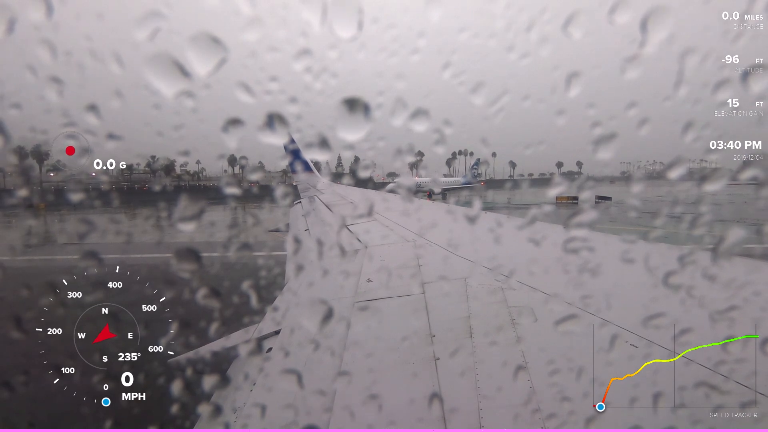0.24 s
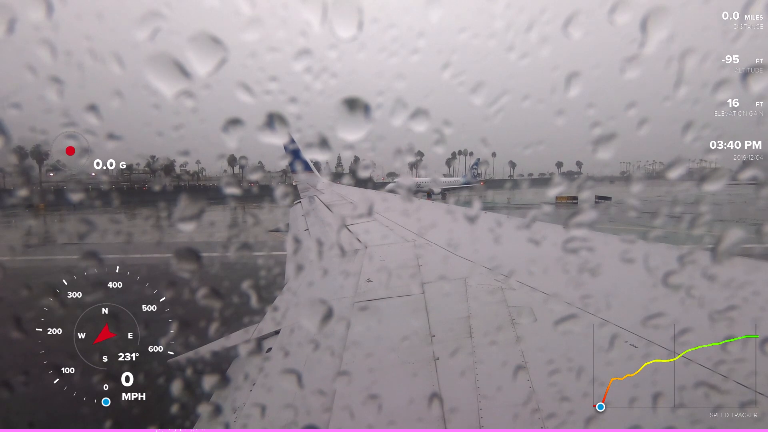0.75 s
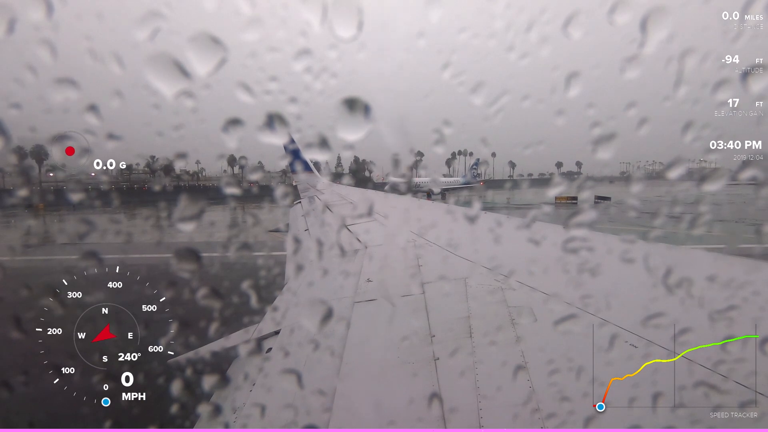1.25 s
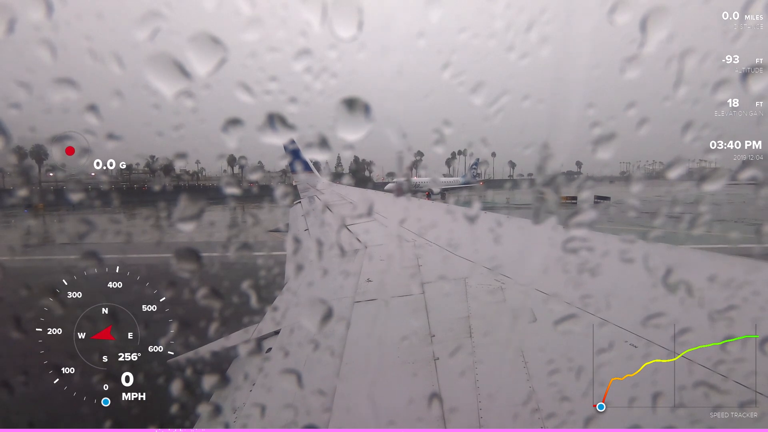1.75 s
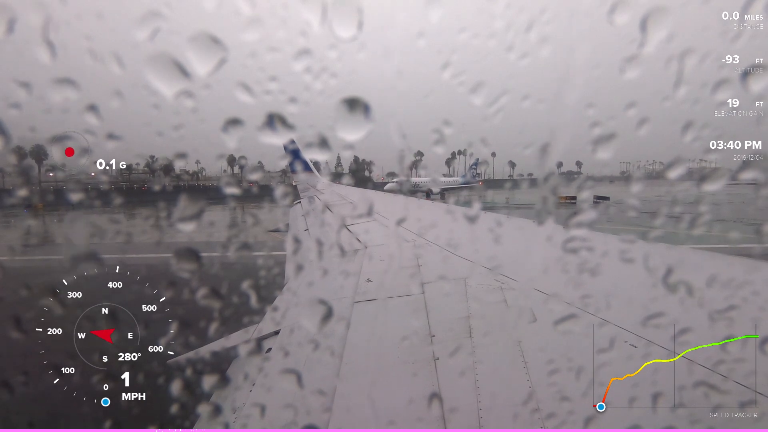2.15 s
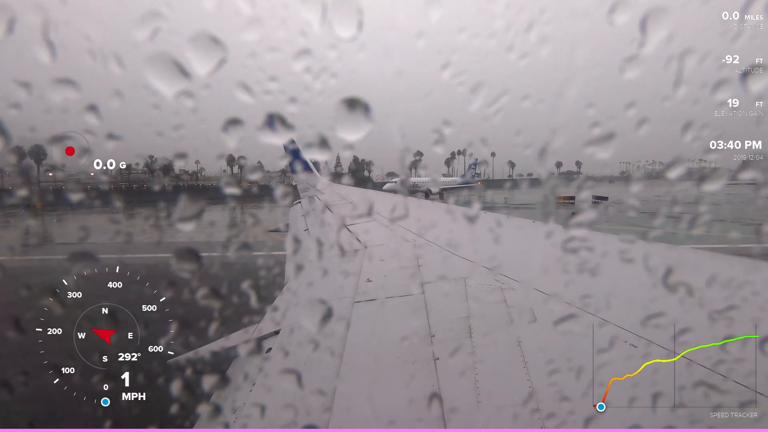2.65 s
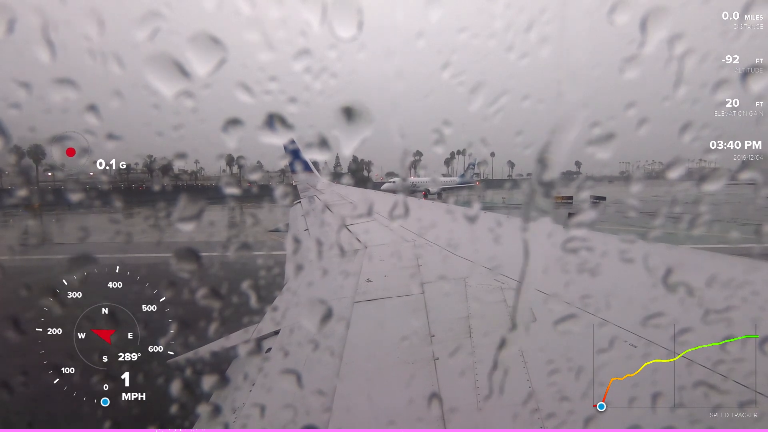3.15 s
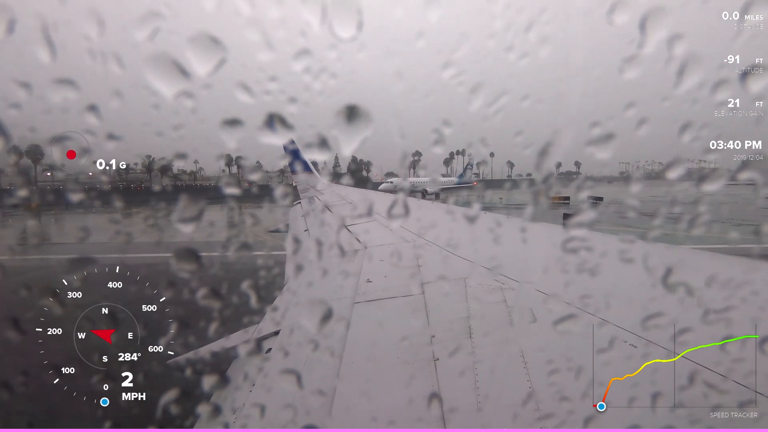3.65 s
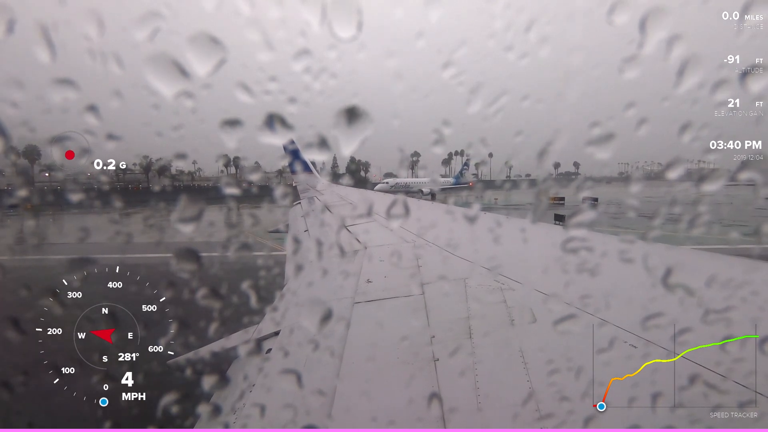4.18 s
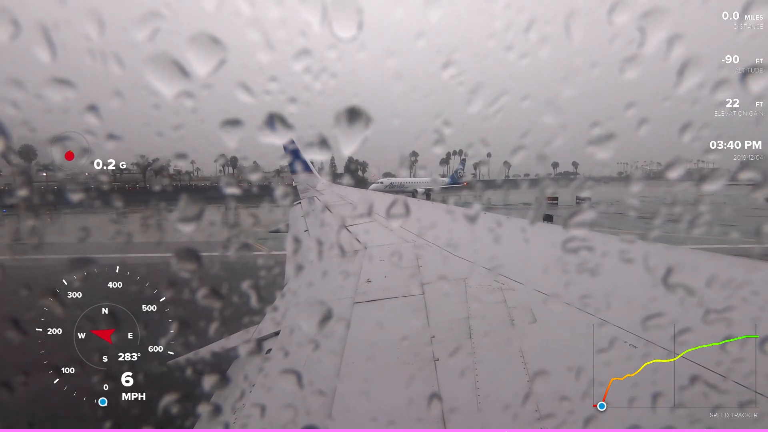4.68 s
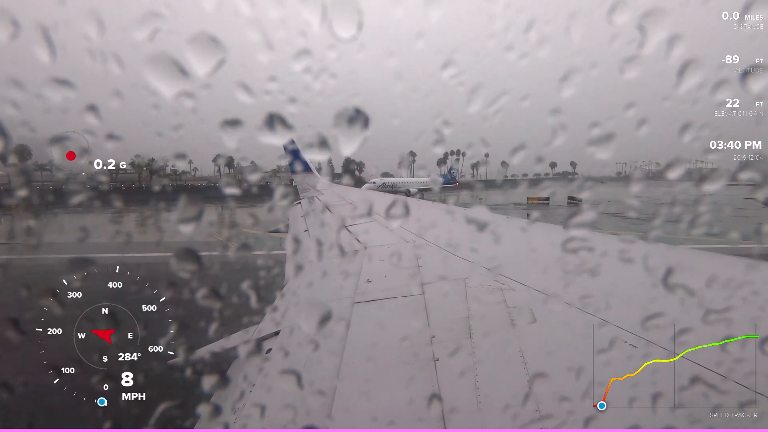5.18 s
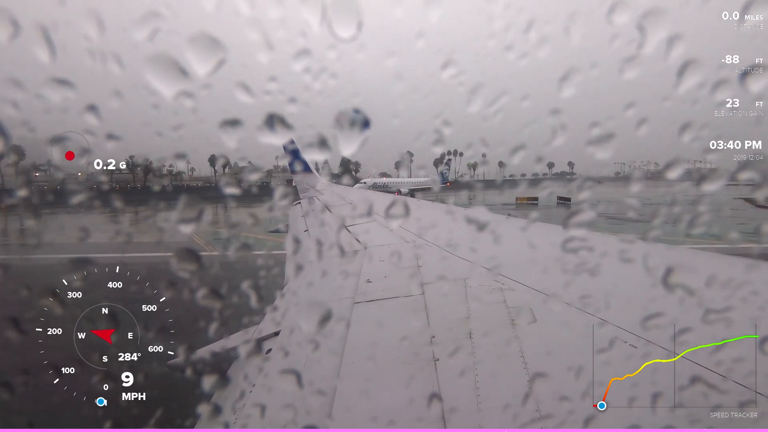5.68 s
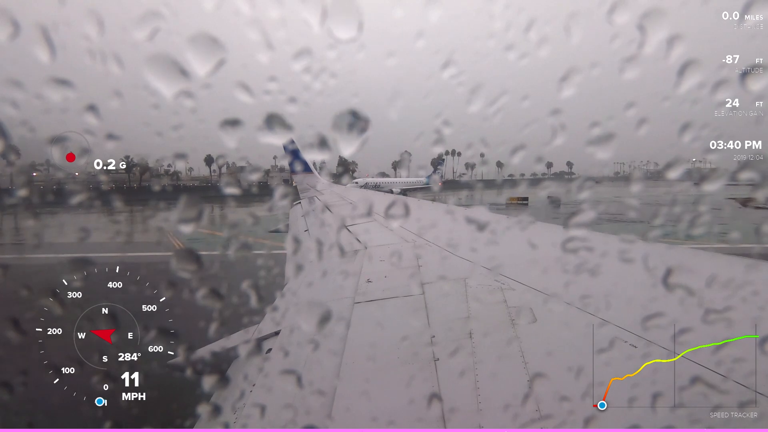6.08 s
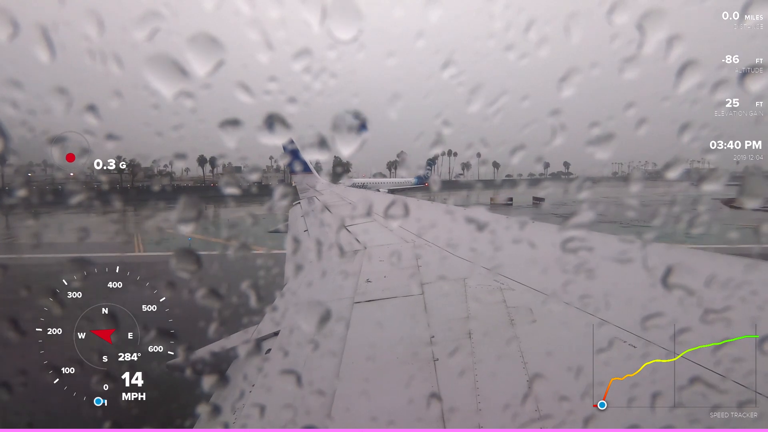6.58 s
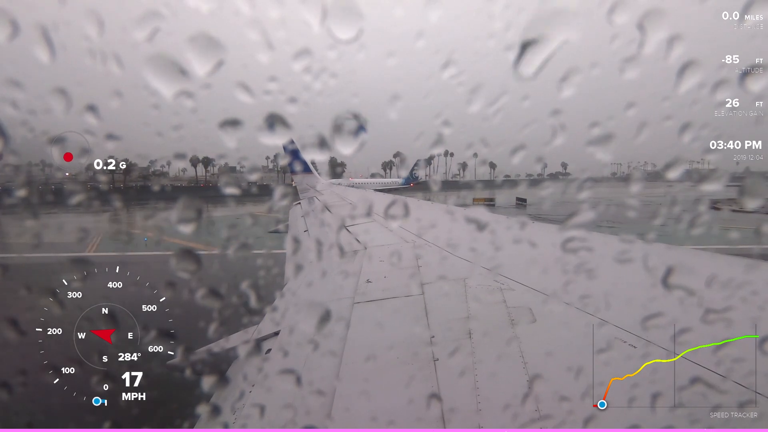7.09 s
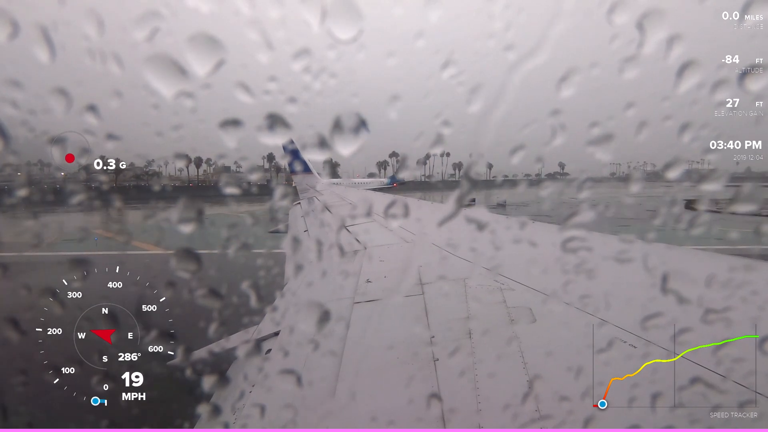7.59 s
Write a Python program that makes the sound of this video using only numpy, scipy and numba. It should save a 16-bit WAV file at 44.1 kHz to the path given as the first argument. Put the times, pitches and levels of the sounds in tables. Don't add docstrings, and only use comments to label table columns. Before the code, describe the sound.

Heavy bass roar of jet engines spooling up, heard by the cabin window, with faint rising whine, steady vent hiss and a small clunk.

```python
import sys
import numpy as np
from scipy import signal
from scipy.fft import rfft, irfft, next_fast_len
from scipy.io import wavfile
from scipy.ndimage import uniform_filter1d, minimum_filter1d
from numba import njit

SR = 44100
rng = np.random.default_rng(int(sys.argv[2]) if len(sys.argv) > 2 else 0)


def voltage_ratio(decibels):
    exponent = np.asarray(decibels, float) / 20
    return 10 ** exponent


def master(y):
    cut = np.clip(np.atleast_2d(y).T, -1, 1)
    pcm = np.round(cut * 32767)
    wavfile.write(sys.argv[1], SR, pcm.astype(np.int16))


N = 345303

# start_s, blade_rate_hz
FAN_SPEED = [(0, 926), (1.5, 961), (2.9, 1058), (3.5, 1102), (4.6, 1228), (5.2, 1294), (6, 1379),
             (6.5, 1441), (7, 1464), (7.83, 1488)]
# start_s, near_offset_hz, far_offset_hz
FAN_OFFSETS = [(0, 0, -10), (3, 0, -12), (3.9, 0, -17), (4.5, 8, -22), (5.1, 12, -25), (5.5, 5, -28),
               (6.1, 6, -20), (6.6, -2, -16), (7, -10, -18), (7.83, 0, -12)]
# pitch_hz, level_db
WALL_TO_WHINE = [(930, -97), (1020, -79.5), (1055, -72.5), (1100, -74), (1150, -69), (1235, -67),
                 (1300, -67), (1360, -69), (1430, -68.5), (1500, -73.5), (2300, -92), (2500, -78.5),
                 (2620, -75), (2750, -80.5), (2950, -92.5)]
# pitch_hz, width_hz
CABIN_MODES = [
    (47.5, 6),
    (79, 3.5),
]
# start_s, length_s, level_db
DEEP_SWELLS = [(0.024, 0.46, -25.5), (0.597, 0.14, -24.5), (0.825, 0.051, -22), (0.982, 0.058, -23.5),
               (1.14, 0.05, -29), (1.3, 0.074, -22.5), (1.43, 0.075, -23.5), (1.643, 0.034, -24),
               (1.765, 0.32, -24.5), (2.208, 0.1, -29), (2.362, 0.046, -29.5), (2.64, 0.071, -32.5),
               (2.778, 0.16, -21.5), (2.963, 0.13, -28.5), (3.138, 0.51, -25.5), (3.72, 0.048, -25.5),
               (3.876, 0.75, -26.5), (4.667, 0.19, -25), (4.92, 0.046, -31), (5.178, 0.042, -38),
               (5.315, 0.17, -22.5), (5.571, 0.122, -22), (5.746, 0.31, -23.5), (6.18, 0.24, -24),
               (6.507, 0.078, -22.5), (6.637, 0.24, -26.5), (7.015, 0.49, -26), (7.487, 0.24, -27),
               (7.768, 0.055, -25)]
# start_s, length_s, level_db
UPPER_SWELLS = [(0.171, 0.078, -21.5), (0.331, 0.039, -25.5), (0.5, 0.16, -24), (0.713, 0.49, -23),
                (1.238, 0.17, -27.5), (1.509, 0.0605, -22), (1.644, 0.095, -22.5), (1.891, 0.14, -20.5),
                (2.069, 0.14, -19), (2.24, 0.35, -23), (2.59, 0.18, -23), (2.857, 0.191, -22.5),
                (3.116, 0.47, -28.5), (3.581, 0.06, -22), (3.812, 0.18, -24), (4.004, 0.067, -30),
                (4.172, 0.076, -25.5), (4.387, 0.14, -28.5), (4.571, 0.15, -26), (4.912, 0.056, -27.5),
                (5.126, 0.19, -25), (5.413, 0.052, -27.5), (5.56, 0.013, -23.5), (5.82, 0.087, -27),
                (5.942, 0.092, -25), (6.147, 0.032, -21), (6.817, 0.026, -23.5), (6.917, 0.027, -20),
                (7.237, 0.027, -23), (7.372, 0.077, -25.5), (7.504, 0.066, -21.5), (7.665, 0.138, -17.5)]
# start_s, pitch_hz
UPPER_PITCH = [(0, 79.5), (.4, 79), (.6, 76.5), (.9, 79), (1.35, 82), (1.6, 78.5), (1.9, 80.5), (2.1, 79.5),
               (2.35, 76), (2.65, 78), (2.9, 78), (3.3, 79), (4, 80), (4.85, 81), (5.4, 75), (5.9, 78),
               (6.5, 75), (7.83, 79)]
# pitch_hz, density_db (per Hz)
SKIN_COLOUR = [(18, -18.5), (28, -3.5), (62, -0.5), (95, -1), (112, -4), (135, -4.5), (157, -0.5),
               (205, -6.5), (284, -10.5), (353, -15), (420, -24), (520, -35), (800, -43), (2500, -79.5),
               (6000, -130)]
# start_s, length_s, level_db
SKIN_SWELLS = [(.3, 0.028, -6), (1.74, 0.12, 1), (3.66, 0.2, 0), (4.28, 0.17, 0), (4.83, 0.39, 2),
               (5.22, 1, 1.5), (6.05, 0.2, -3), (6.3, 0.35, 1), (6.9, 0.16, 2), (7.17, 0.16, 1.5),
               (7.63, 0.2, 4.5)]
# start_s, length_s, level_db
WALL_SWELLS = [(0.094, 0.011, -30), (0.286, 0.02, -20), (0.651, 0.026, -28), (1.2, 0.038, -33.5),
               (1.41, 0.034, -25.5), (1.606, 0.039, -34), (1.808, 0.046, -24), (2.029, 0.1, -28),
               (2.933, 0.28, -27), (3.662, 0.18, -27.5), (3.928, 0.039, -33), (4.265, 0.25, -28),
               (4.605, 0.38, -23), (5.03, 0.27, -25.5), (5.36, 0.26, -20), (5.777, 0.57, -27.5),
               (6.27, 0.62, -27), (6.85, 0.2, -30), (7.203, 0.31, -31), (7.525, 0.36, -23.5)]
# start_s, length_s, level_db
FLOOR_SWELLS = [(0.042, 0.13, -28), (0.266, 0.073, -26.5), (0.802, 0.04, -32), (1.318, 0.16, -30),
                (1.62, 0.043, -40), (1.753, 0.14, -23.5), (2.337, 0.032, -37.5), (2.78, 0.15, -28),
                (3.51, 0.13, -29), (3.677, 0.39, -26), (4.333, 0.067, -25), (4.508, 1.08, -26),
                (5.707, 0.031, -23), (5.902, 0.1, -28.5), (6.281, 0.32, -17.5), (6.775, 0.55, -24),
                (7.407, 0.12, -35), (7.644, 0.19, -20)]
# pitch_hz, density_db (per Hz)
AIR_COLOUR = [(300, -13), (480, -7), (680, -4), (900, -12), (1120, -19), (1500, -17.5), (2450, -21),
              (2700, -25.5), (5000, -36), (5800, -48), (7800, -42.5), (9400, -50.5), (12800, -56),
              (15500, -69.5)]
# start_s, level_db
VENT_LEVEL = [(0, 0), (.45, -1.5), (.7, -0.2), (1, -1), (2, 0), (2.5, -1), (3, -0.5), (3.6, -1), (4, 0),
              (4.7, -0.5), (5.2, 0), (5.6, -1), (6, -0.5), (6.4, -1), (6.8, -1), (7.3, -0.5), (7.83, -1)]
PUMP_PITCHES = [894, 1510, 1860, 2420, 3591, 3500, 4490]
# width_hz, level_db
PUMP_BANDS = [(9, -65), (24, -71.5), (111, -73), (120, -81), (16, -79), (610, -77), (10, -93)]
PUMP_FADES = [0, -1, 0, -1.5, -4.5, 0, -4.5]
# pitch_hz, width_hz, idle_db, full_thrust_db
LINING_PANELS = [(352.1, 10, -53.5, -41.5), (440, 11, -60, -53.5), (523, 10, -70.5, -61.5),
                 (593.4, 18, -67.5, -60), (682, 16, -65.5, -65.5), (765, 16, -71.5, -69.5),
                 (942, 16, -76, -74), (1033, 10, -76, -80.5)]
# start_s, level_db, top_band_extra_db, low_band_extra_db
CLIP_TICKS = [(2.2123, -68, -22, -3), (2.5546, -67, -17, -7), (3.312, -65, -13.5, -3),
              (3.914, -70.5, -18, 2), (4.1765, -67.5, -13, 3.5), (4.2672, -63.5, -26, -6),
              (4.386, -59.5, -21.5, -2), (4.7566, -63, -15.5, -4), (4.868, -70, -17, -7),
              (4.9173, -63, -25, -2.5), (5.034, -58, -23.5, -6), (5.0689, -59.5, -17, -5),
              (5.5533, -68, -17, 3), (5.6596, -60, -28, -11), (5.6975, -57.5, -23, -10),
              (5.807, -58.5, -21.5, -9), (5.8437, -57.5, -21, -11), (5.8776, -64.5, -17.5, -9),
              (5.9789, -64.5, -21, -1), (6.2787, -59, -25, -15), (6.3146, -65, -19, -7),
              (6.5715, -65, -24.5, -7), (6.6096, -69, -17, -4), (7.204, -59.5, -25, -14),
              (7.244, -61.5, -23, -11), (7.2768, -62, -24, -5), (7.6151, -62, -16.5, -7)]
# start_s, low_band_db, mid_band_db, high_band_db
PANEL_KNOCKS = [(3.311, -72, -65, -73), (3.418, -67, -64, -78), (3.434, -65, -65.5, -78),
                (3.82, -57.5, -66.5, -78), (3.952, -61, -63.5, -78), (4.176, -62, -67.5, -68),
                (4.386, -53, -59, -73), (4.756, -62, -63.5, -72), (6.021, -54, -77.5, -82),
                (7.276, -58.5, -63, -72), (7.744, -58, -70.5, -67)]
# start_s, pitch_hz, level_db
VALVE_GLIDE = [(3.7, 1902, -89), (3.82, 1850, -79), (4, 1890, -75), (4.2, 1760, -83), (4.4, 1740, -74.5),
               (4.6, 1650, -81), (4.7, 1636, -100)]
# start_s, level_db, crack_extra_db (short high modes)
LATCH_BLOWS = [
    (4.907, -54, -31),
    (4.9165, -45.5, -3),
]
# pitch_hz, level_db, t60_s
LATCH_MODES = [(684, 5, 0.028), (1276, -0.5, 0.014), (1327, 1, 0.016), (1650, -9.5, .035)]
# pitch_hz, level_db, t60_s
CRACK_MODES = [(2320, -5.5, 0.009), (3200, -6, .007), (3800, -13, .007), (5300, -10, 0.007),
               (6570, -18, .006)]

HALF_THRUST_HZ, THRUST_SPAN_HZ = 1180, 71.6
SWELL_EDGE_S = 0.011
PUFF_RISE_S = 0.0043


def unit(x):
    return x / np.sqrt(np.mean(x ** 2))


def curves(table):
    s, *columns = np.transpose(table)
    return [np.interp(np.arange(N) / SR, s, c) for c in columns]


def shaped(gain_at):
    size = next_fast_len(N)
    hz = np.maximum(np.arange(size // 2 + 1) * SR / size, 1.)
    spectrum = rfft(rng.standard_normal(size)) * gain_at(hz)
    return unit(irfft(spectrum, size)[:N])


def colour(table):
    hz, db = np.transpose(table)
    return lambda f: voltage_ratio(np.interp(np.log(f), np.log(hz), db))


def resonance(hz, width_hz):
    return lambda f: 1 / (1 + ((f - hz) / width_hz) ** 2)


def walk(rate):
    hold = int(SR / rate)
    steps = np.repeat(rng.standard_normal(N // hold + 1), hold)
    return unit(uniform_filter1d(uniform_filter1d(steps, hold), hold)[:N])


def tone(hz):
    return np.sin(2 * np.pi * np.cumsum(hz) / SR)


def swells(rows, lull_db):
    t, db = np.arange(N) / SR, np.full(N, 1. * lull_db)
    for start, length, top_db in rows:
        inside = np.clip(np.minimum(t - start, start + length - t) / SWELL_EDGE_S + .5, 0, 1)
        db = db + (top_db - lull_db) * inside
    return voltage_ratio(db)


def boom(hz, width_hz, steady):
    x = shaped(resonance(hz, width_hz))
    swell = np.sqrt(uniform_filter1d(x ** 2, int(2 * SR / hz)) + 0.014)
    return unit(x / swell ** steady)


def thrust():
    fan_hz, = curves(FAN_SPEED)
    return 1 / (1 + np.exp((HALF_THRUST_HZ - fan_hz) / THRUST_SPAN_HZ))


def by_thrust(idle, full):
    return idle + (full - idle) * thrust()


def settling():
    return 4.5 * np.exp(-(np.arange(N) / SR / 0.77) ** 2)


def cabin_booms():
    deep, upper = CABIN_MODES
    out = voltage_ratio(2 * thrust() - 1.5) * swells(DEEP_SWELLS, -32.5) * boom(*deep, steady=0.89)
    clean_share = by_thrust(0.99, 0.71)
    hum = np.sqrt(2 * clean_share) * tone(curves(UPPER_PITCH)[0])
    hum += np.sqrt(1 - clean_share) * boom(*upper, steady=0.91)
    return out + voltage_ratio(3.5 * thrust() - 3.0) * swells(UPPER_SWELLS, -33.5) * hum


def skin_rumble():
    skin_db = by_thrust(-31.5, -23.5) + 0.88 + 0.35 * walk(6.3)
    out = voltage_ratio(skin_db) * swells(SKIN_SWELLS, 0) * shaped(colour(SKIN_COLOUR))
    out += voltage_ratio(by_thrust(-48.5, -32)) * shaped(resonance(hz=263, width_hz=70.0))
    out += voltage_ratio(-5.5) * swells(WALL_SWELLS, -33) * boom(112., 8.0, steady=0.99)
    return out + voltage_ratio(-8.5) * swells(FLOOR_SWELLS, -38.5) * boom(158., 9., steady=0.43)


def fan_whine():
    fan_hz, = curves(FAN_SPEED)
    wall_gain = colour(WALL_TO_WHINE)
    out = np.zeros(N)
    for offset_hz, fan_db in zip(curves(FAN_OFFSETS), (1.5, -3.5)):
        blade_hz = offset_hz + fan_hz * (1 + .0015 * walk(6) + .004 * walk(90))
        flutter = voltage_ratio(fan_db + 3.7 * walk(12))
        first = wall_gain(fan_hz) * tone(blade_hz)
        second = wall_gain(2 * fan_hz) * tone(2 * blade_hz)
        out += flutter * (first + second)
    return out


def vent_air():
    air_db = by_thrust(-65, -63.5) + settling()
    vent_db, = curves(VENT_LEVEL)
    treble_vent_db = 2.2 * vent_db
    rush = shaped(colour(AIR_COLOUR))
    hiss = signal.sosfiltfilt(signal.butter(2, 3000, "high", fs=SR, output="sos"), rush)
    vents = voltage_ratio(vent_db) * (rush - hiss) + voltage_ratio(treble_vent_db) * hiss
    out = voltage_ratio(air_db + 10.0 + .5 * walk(11.0)) * vents
    air_db = air_db + treble_vent_db
    out += voltage_ratio(air_db - 15 - 3 * thrust() + 1.8 * walk(20)) * shaped(resonance(4300, 900))
    out += voltage_ratio(by_thrust(-95, -80)) * shaped(resonance(hz=3220, width_hz=250))
    port = shaped(lambda f: 1 / (1 + ((f - 7800) / 1050) ** 4))
    out += voltage_ratio(air_db - 1.4 * vent_db - 20.0 + 1.2 * walk(7.4)) * port
    return out + voltage_ratio(air_db - 37) * shaped(resonance(hz=12400, width_hz=700))


def pumps():
    rise = (curves(FAN_SPEED)[0] - FAN_SPEED[0][1]) / 100
    out = np.zeros(N)
    for hz, (width_hz, db), fade_db in zip(PUMP_PITCHES, PUMP_BANDS, PUMP_FADES):
        out += voltage_ratio(db + fade_db * rise) * boom(1. * hz, width_hz / 2, steady=0.52)
    return voltage_ratio(by_thrust(-0.5, -8) + .6 * settling()) * out


def lining():
    seal = shaped(lambda f: 1 / (1 + ((f - 10700) / 1300) ** 4))
    out = voltage_ratio(by_thrust(-96.5, -98) + 1.3 * settling()) * seal
    for hz, width_hz, idle_db, full_db in LINING_PANELS:
        panel_db = by_thrust(idle_db, full_db) + 0.4 * settling() + 0.73 * walk(4)
        out += voltage_ratio(panel_db) * shaped(resonance(hz, width_hz))
    return out


def puffs(times, db, hz, width_hz, t60):
    blows = np.zeros(N)
    blows[(times * SR).astype(int)] = voltage_ratio(db)
    blows = uniform_filter1d(blows, size=int(PUFF_RISE_S * SR))
    noise = shaped(resonance(hz, width_hz))
    noise = noise / np.sqrt(uniform_filter1d(noise ** 2, size=int(PUFF_RISE_S * SR / 2)))
    decay = np.exp(-np.log(1000) / (t60 * SR))
    return signal.lfilter([1], [1, -decay], blows) * noise


def clip_ticks():
    s, tick_db, top_db, low_db = np.transpose(CLIP_TICKS)
    out = puffs(s, tick_db - 5.0, hz=7560, width_hz=1100, t60=0.025)
    out += puffs(s, tick_db + top_db - 5.5, hz=11500, width_hz=3500, t60=.02)
    return out + puffs(s, tick_db + low_db - 8, hz=5000, width_hz=800, t60=.02)


def panel_knocks():
    s, low_db, mid_db, high_db = np.transpose(PANEL_KNOCKS)
    out = puffs(s, low_db, hz=1950, width_hz=450, t60=0.085)
    out += puffs(s, mid_db, hz=3330, width_hz=1100, t60=0.12)
    return out + puffs(s, high_db - 3.5, hz=5200, width_hz=1100, t60=.05)


def valve_squeal():
    valve_hz, valve_db = curves(VALVE_GLIDE)
    return voltage_ratio(valve_db + 2.9 * walk(25)) * tone(valve_hz * (1 + 0.005 * walk(30)))


def ring(x, hz, t60):
    r, w = np.exp(-np.log(1000) / (t60 * SR)), 2 * np.pi * hz / SR
    return signal.lfilter([0, np.sin(w)], [1, -2 * r * np.cos(w), r * r], x)


def latch_modes(modes, extra):
    blows = np.zeros(N)
    for at, db, extra_db in LATCH_BLOWS:
        blows[int(at * SR)] = voltage_ratio(db + extra * extra_db)
    out = np.zeros(N)
    for hz, db, t60 in modes:
        peak = t60 * SR / np.log(1000) / (2 * np.e)
        out += voltage_ratio(db) / peak * ring(ring(blows, hz, t60), hz, t60)
    return out


def latch_clunk():
    contact = puffs(np.array([LATCH_BLOWS[1][0]]), -54, hz=3000, width_hz=2200, t60=.015)
    return contact + latch_modes(LATCH_MODES, 0) + latch_modes(CRACK_MODES, 1)


def scene():
    engines = cabin_booms() + skin_rumble() + fan_whine()
    cabin = vent_air() + pumps() + lining() + valve_squeal()
    trim = clip_ticks() + panel_knocks() + latch_clunk()
    return (engines + cabin + trim)[None] * voltage_ratio(2.5)


@njit
def rider(x, top, slope, attack, release):
    gain, envelope = np.empty(len(x)), top
    for i in range(len(x)):
        a = abs(x[i])
        envelope += (a - envelope) * (attack if a > envelope else release)
        gain[i] = min(1., (top / envelope) ** slope)
    return gain


def roll_off(x):
    return signal.sosfilt(signal.butter(12, 15440, fs=SR, output="sos"), x)


def record(dry):
    attack_s, release_s, ahead = 0.0014, .12, int(0.0029 * SR)
    gain = rider(dry[0], voltage_ratio(-15.0), .9, 1 / (attack_s * SR), 1 / (release_s * SR))
    gain = uniform_filter1d(minimum_filter1d(gain, 2 * ahead), ahead)
    bass = signal.sosfiltfilt(signal.butter(2, 600, fs=SR, output="sos"), dry)
    held = bass * gain + (dry - bass) * gain ** .3
    return roll_off(held)


dry = scene()
out = record(dry)
master(out)
```